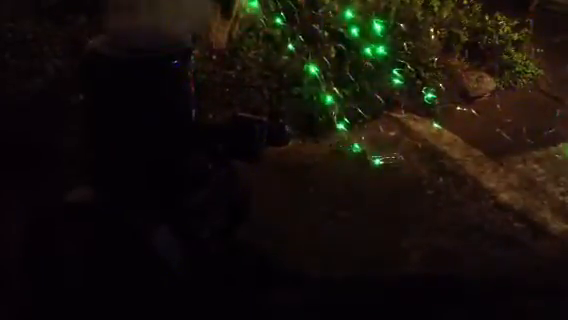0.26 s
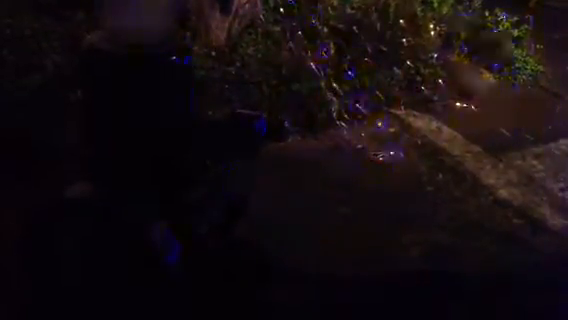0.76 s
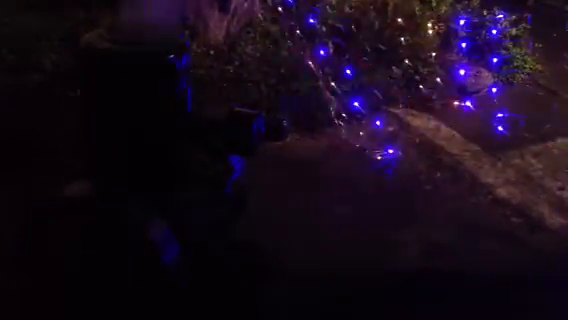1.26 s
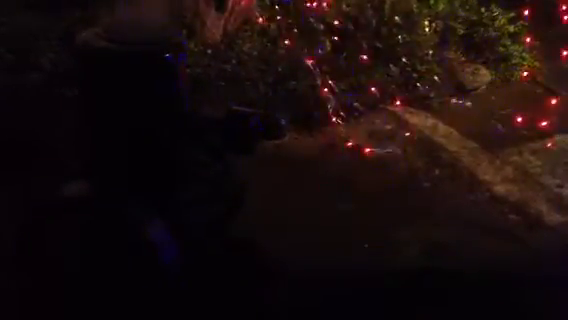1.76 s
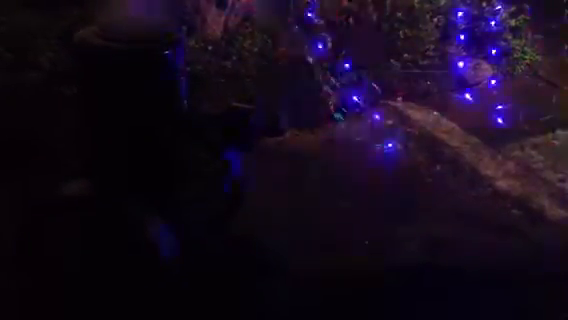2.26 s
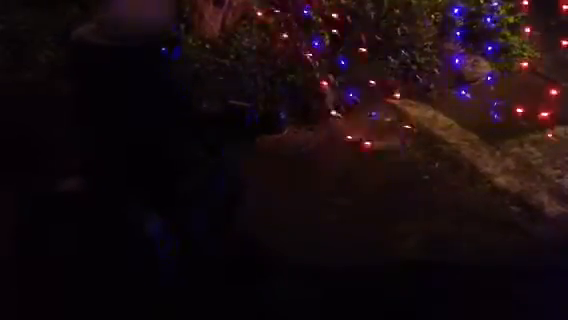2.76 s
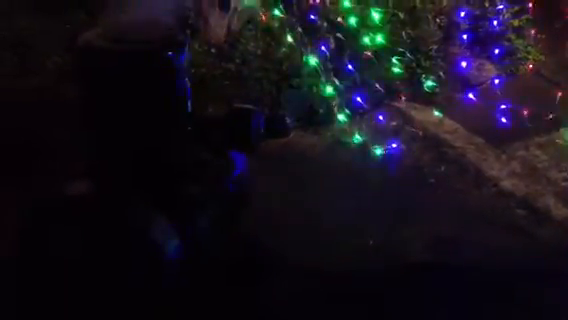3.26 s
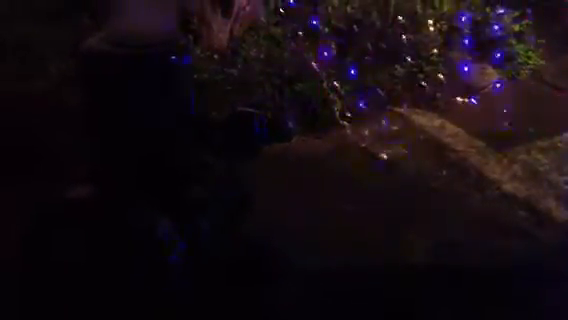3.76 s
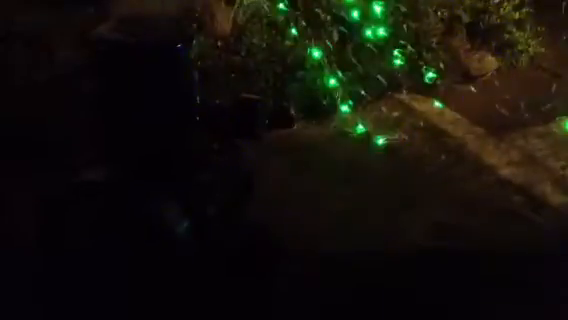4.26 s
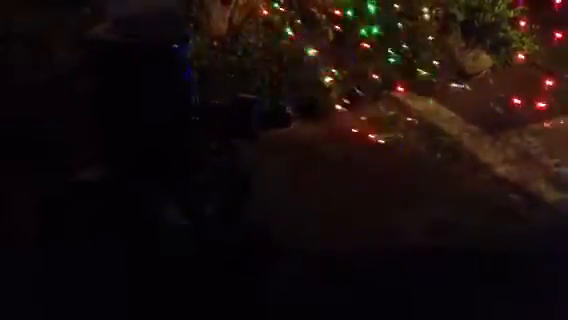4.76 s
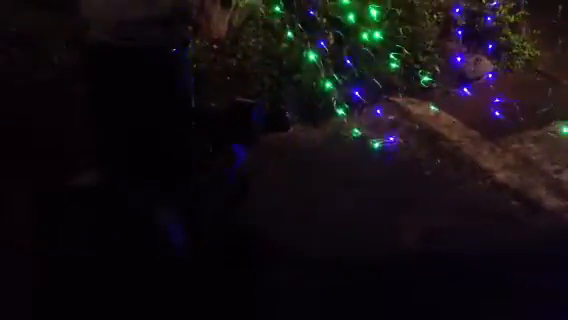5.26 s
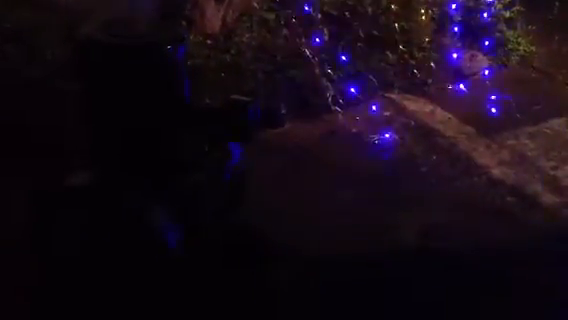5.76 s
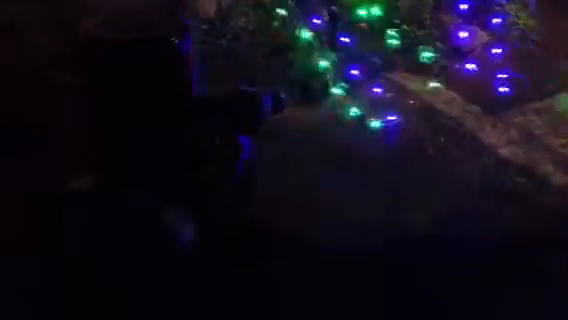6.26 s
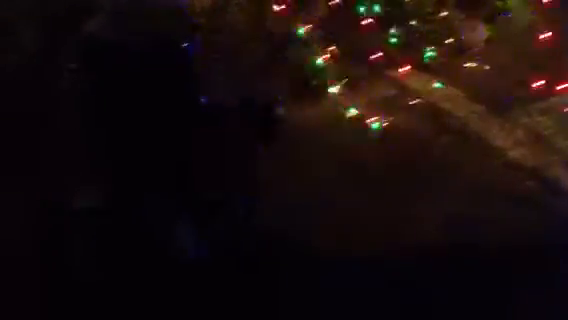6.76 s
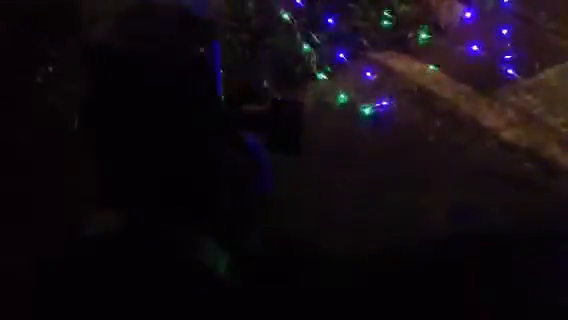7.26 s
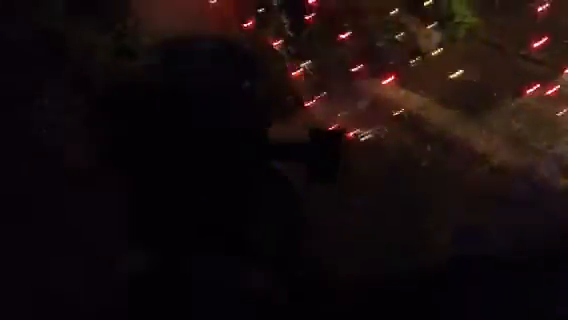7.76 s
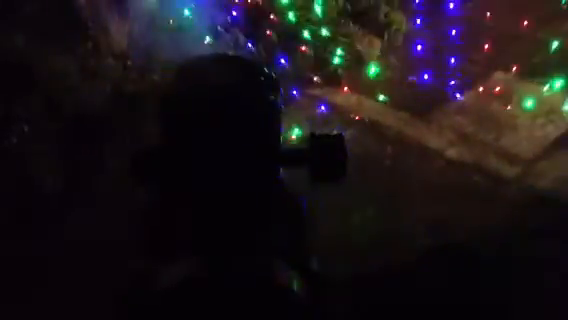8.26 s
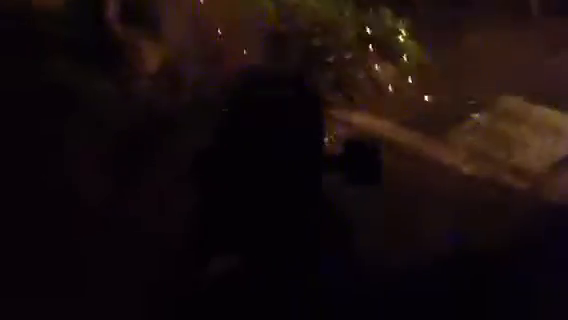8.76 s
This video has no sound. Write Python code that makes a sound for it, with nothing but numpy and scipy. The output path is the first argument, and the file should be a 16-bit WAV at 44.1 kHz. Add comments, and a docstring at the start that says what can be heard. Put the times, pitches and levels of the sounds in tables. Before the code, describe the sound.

From the very start, a slow single-cylinder engine is idling in a yard, a few steps from the microphone. It thumps evenly about four times a second for the whole nine seconds, speeding up only very slightly. Each beat is a sharp exhaust pop with a short squealing rush of gas, a quick metallic ring from the silencer and a soft boom from the pipe, followed by brief reflections from the yard. Between beats, more quietly, the intake gulps, valves clack and gears clatter. From about 6.5 seconds the microphone moves closer: the beats and clacks grow louder, the yard's reverberation becomes fuller, and a low hum and a thin high hiss swell, peaking around 8.5 seconds. One faint, short scuff comes at about 8.7 seconds. The level eases a little, and the engine is still running at the end.

```python
"""A slow single-cylinder engine thumps four times a second in a yard, a few steps away.
Each firing is a pressure pulse and a short squealing gas jet; the silencer rings, the pipe booms,
the yard answers. Between firings the intake gulps, valves clack and gears clatter.
Late on the microphone moves in: the yard, a low hum and a thin hiss swell, with one brief scuff."""
import sys
import numpy as np
from scipy import signal
from scipy.fft import rfft, irfft, next_fast_len
from scipy.io import wavfile

SR = 44100
rng = np.random.default_rng(int(sys.argv[2]) if len(sys.argv) > 2 else 0)


def generate_wav(signal):
    """Clip the signal to [-1, 1] and save it as 16-bit WAV at the path in sys.argv[1]."""
    frames = np.transpose(np.atleast_2d(signal))
    scaled = np.clip(frames, -1, 1) * 32767
    pcm = np.round(scaled).astype(np.int16)
    wavfile.write(sys.argv[1], SR, pcm)


N = 397782
LEAD = SR // 10  # the engine is already running at 0 s
TIME_S = np.arange(-LEAD, N) / SR
AGE_S = np.arange(SR // 3) / SR  # time since a firing

# engine speed: time_s, firings_per_s
SPEED = [(0.0, 3.8571), (0.8, 3.9007), (1.8, 3.9229), (2.5, 3.9684), (4.4, 3.9695), (6.1, 4.0299),
         (7.5, 4.0423), (8.8, 4.0013)]
# microphone closeness: time_s, near_db
NEARNESS = [(0, -1.5), (1.5, -.5), (3, 0), (5, 0), (6.2, -.3), (7, 2.5), (8, 4), (8.5, 4.5), (9.02, 3)]


def amp(db):
    return 10 ** (np.asarray(db) / 20)


def unit_rms(x):
    return x / np.sqrt(np.mean(x ** 2) + 1e-20)


def at_time(curve, time_s=TIME_S):
    return np.interp(time_s, *np.transpose(curve))


def at_freq(curve, hz):
    freq_hz, value = np.transpose(curve)
    return np.interp(np.log(hz + 1), np.log(freq_hz + 1), value)


def noise(n=len(TIME_S)):
    return rng.standard_normal(n)


def coloured_noise(spectrum, n=len(TIME_S)):
    size = next_fast_len(n)
    gain = amp(at_freq(spectrum, np.fft.rfftfreq(size, 1 / SR)))
    return unit_rms(irfft(rfft(noise(n), size) * gain, size)[:n])


def resonate(x, hz, width_hz):
    """Double-pole resonance, rms 1."""
    pole = np.exp((2j * np.pi * hz - np.pi * width_hz) / SR)
    return unit_rms(signal.lfilter([1], [1, -2 * pole, pole * pole], x).real)


def ring(modes, rise_s, detune=.012):
    """Modes struck once; gas heat shifts their pitch a little."""
    hz, db, t60_s = np.transpose(modes)[:, :, None]
    hz = hz * (1 + detune * rng.standard_normal(hz.shape))
    partials = amp(db - 60 * AGE_S / t60_s) * np.sin(2 * np.pi * hz * AGE_S)
    return partials.sum(0) * (1 - np.exp(-AGE_S / rise_s))


def delayed(x, delay_s):
    return np.interp(AGE_S - delay_s, AGE_S, x, left=0)


def puff(age_s, rise_s, decay_s):
    return np.clip(age_s / rise_s, 0, 1) * np.exp(-np.maximum(age_s - rise_s, 0) / decay_s)


def firing_times(first_s=-.017, short_cycle=12, skip_s=.0232):
    """One firing per cycle. The sound skips once: a 23 ms dropout shortens one cycle."""
    times_s = [first_s]
    while times_s[-1] < N / SR:
        cycle_s = 1 / at_time(SPEED, times_s[-1])
        times_s.append(times_s[-1] + cycle_s - skip_s * (len(times_s) - 1 == short_cycle))
    return np.array(times_s)


def crank():
    """Per sample: time since the last firing, cycle length."""
    times_s = firing_times()
    last_s = times_s[np.maximum(np.searchsorted(times_s, TIME_S, side="right") - 1, 0)]
    return np.maximum(TIME_S - last_s, 0), 1 / at_time(SPEED, last_s)


def strokes(events, age_s, cycle_s, scatter_db=1.5):
    """Envelope of events tied to crank angle; levels vary per cycle."""
    turn = np.cumsum(np.diff(age_s, prepend=0) < 0)
    sizes = amp(scatter_db * rng.standard_normal((turn[-1] + 1, len(events))))
    power = sum((amp(db) * size[turn] * puff(age_s - phase * cycle_s, rise_s, decay_s)) ** 2
                for size, (phase, rise_s, decay_s, db) in zip(sizes.T, events))
    return np.sqrt(power)


def blowdown(near_db, front_s=.0007, round_trip_s=.0023):
    """Exhaust valve opens: a steep push and suck, then its return from the pipe."""
    def wave(centre_s, width_s):
        u = (AGE_S - centre_s) / width_s
        return -u * np.exp(-u * u / 2)
    front = wave(front_s, width_s=.0002) + amp(5.5) * wave(front_s, width_s=.00015)
    onset = 1 - np.exp(-(AGE_S / .00015) ** 2)
    echo = wave(front_s + round_trip_s * rng.uniform(.975, 1.025), width_s=.00017)
    echo_db = 4.3 - 2 * near_db  # fades as the microphone moves round the pipe
    return amp(.4) * (front * onset + amp(echo_db) * echo)


def silencer(near_db):
    """The pulse strikes the silencer: a bright ring and a deep thud."""
    # silencer resonances: pitch_hz, level_db, t60_s
    ring_modes = [(450, -12, .022), (680, -8.5, .018), (1385, -15, .022), (1820, -17, .02),
                  (2350, -16, .018), (3950, -6, .018), (4500, -9, .018), (7400, -19, .012)]
    # deep body mode: pitch_hz, level_db, t60_s
    thud_mode = [(415, 3.5, .0155)]
    clang = amp(3) * delayed(ring(ring_modes, rise_s=.0006), delay_s=.00123)
    return clang + amp(-.9 * near_db) * ring(thud_mode, rise_s=.0003)


def jet(start_s, near_db, peak_s=.0112, spread_s=.0049):
    """Gas bursts from the pipe: turbulent rush, fixed squeal, wandering lower whistle."""
    # turbulence: freq_hz, density_db
    spectrum = [(40, -19), (100, -14), (220, -1), (400, -4), (600, -5), (1100, -5), (1700, .5), (2250, 1),
                (2800, -8), (3800, 2.5), (5700, -4.5), (7200, 2), (9000, 2), (11000, -1.5), (15000, -2)]
    # lock into the squeal, which drains the rush: time_s, lock_db
    locking = [(0, 0), (1.0, 2), (1.6, -3), (2.8, .5), (3.5, -1), (5.3, 1.5), (6.0, 5), (6.6, 2), (7.05, 2),
               (7.5, -2.5), (8.3, 0), (9.02, -4)]
    # lower whistle: time_s, level_db, pitch_hz
    whistling = [(0, -22, 2120), (1.6, -22.5, 2160), (2.4, -27.5, 1900), (3.3, -24.5, 2050),
                 (3.9, -20.5, 2200), (4.6, -25.5, 2050), (5.7, -25, 2220), (6.8, -19.5, 1960),
                 (7.3, -25, 1970), (9.02, -26, 2250)]
    time_s, level_db, pitch_hz = np.transpose(whistling)
    lock_db = at_time(locking, start_s)
    rush_db = rng.normal(-10.8, .4) - .45 * lock_db - .15 * near_db
    squeal_db = rng.normal(-17.2, 1.2) + lock_db
    whistle_db = np.interp(start_s, time_s, level_db) + rng.normal(1.2, 1.2)
    whistle_hz = np.interp(start_s, time_s, pitch_hz) + rng.normal(0, 50)
    n = SR // 25
    age_s = AGE_S[:n]
    flow = np.exp(-((age_s - peak_s) / spread_s) ** 2 / 2) * (1 - np.exp(-(age_s / .004) ** 2))
    rush = amp(rush_db) * unit_rms(flow * coloured_noise(spectrum, n))
    squeal = amp(squeal_db) * unit_rms(flow * resonate(noise(n), hz=4680, width_hz=560))
    whistle = amp(whistle_db) * unit_rms(flow * resonate(noise(n), whistle_hz, width_hz=340))
    flow_rms = np.sqrt(np.mean(flow ** 2))
    return np.pad(flow_rms * (rush + squeal + whistle), (0, len(AGE_S) - n))


def pipe_mouth(x, near_db):
    """A narrow pipe radiates little bass; the cutoff falls as the microphone nears."""
    cutoff_hz = 202 * 2 ** (-.06 * near_db)
    return signal.sosfilt(signal.butter(2, cutoff_hz, "high", fs=SR, output="sos"), x)


def yard(shot, near_db, tail_db=-1, walls_db=-5.5):
    """Short diffuse tail, plus reflections that shift as the microphone moves."""
    # reverberation: freq_hz, t60_s
    decay = [(100, .26), (400, .2), (1500, .22), (3200, .26), (4600, .22), (6000, .24), (9000, .2),
             (15000, .18)]
    # ground and wall reflections: delay_s, level_db, shift_s_per_near_db
    reflections = [(.006, -7, .0002), (.0098, -13, 0), (.0192, -11, -.0001), (.0232, -9, -.0011),
                   (.035, -16, 0), (.048, -18, -.0015)]
    n = len(shot)
    hz, time_s, bins = signal.stft(noise(n), SR, nperseg=256)
    bins *= amp(-60 * time_s / at_freq(decay, hz)[:, None])
    tail = signal.istft(bins, SR, nperseg=256)[1][:n] * np.clip(AGE_S / .008, 0, 1)
    diffuse = signal.fftconvolve(shot, tail / np.linalg.norm(tail))[:n]
    walls = sum(amp(db) * delayed(shot, delay_s + shift * near_db + rng.normal(0, .0001))
                for delay_s, db, shift in reflections)
    return amp(-11 + 1.5 * near_db) * (amp(tail_db) * diffuse + amp(walls_db) * walls)


def boom(near_db, delay_s=.015, rise_s=.004):
    """The pipe's air column and a low hum build behind the pulse."""
    # air column: pitch_hz, level_db, t60_s
    column_modes = [(93, -22, .3), (140, -18.5, .25), (178, -21.5, .23), (240, -14, .17), (290, -17, .13)]
    # hum, heard only close by: pitch_hz, level_db, t60_s
    hum_modes = [(192, -19, .45), (255, -15, .13)]
    column = amp(-10.3 + .1 * near_db) * ring(column_modes, rise_s, detune=.015)
    hum = amp(-17 + 2.7 * near_db) * ring(hum_modes, rise_s, detune=.03)
    return delayed(column + hum, delay_s)


def exhaust():
    """All firings, each slightly different, with boom and yard."""
    mix = np.zeros(len(TIME_S))
    for start_s in firing_times()[:-1]:
        near_db = at_time(NEARNESS, start_s)
        pulse_gain = amp(rng.normal(-14.6, .6) + .75 * near_db)
        gas = jet(start_s, near_db)
        pulse = pulse_gain * (blowdown(near_db) + silencer(near_db))
        shot = pipe_mouth(pulse + gas, near_db)
        firing = shot + pulse_gain * boom(near_db) + yard(shot, near_db)
        span = mix[round(start_s * SR) + LEAD:][:len(firing)]
        span += firing[:len(span)]
    return mix


def gears(jolts_per_s=130, jolt_db=2.2, taps_per_s=45):
    """Teeth meet unevenly; backlash taps the casing."""
    # gear clatter: freq_hz, density_db
    spectrum = [(30, -35), (75, -20), (210, -2), (400, -5.5), (600, -12.5), (950, -2), (1150, -1),
                (1360, 2.5), (1600, -4), (2200, -4), (3000, -15), (4000, -15), (4700, -9), (5600, -19),
                (15000, -21)]
    n = len(TIME_S)
    jolts = np.interp((TIME_S - TIME_S[0]) * jolts_per_s, np.arange(n), noise())
    clatter = amp(-45.5 + jolt_db * jolts) * coloured_noise(spectrum)
    taps = rng.uniform(.3, 1, n) * (rng.random(n) < taps_per_s / SR)
    return clatter + amp(-52) * resonate(taps, hz=1370, width_hz=190)


def intake(age_s, cycle_s):
    """Gulps of air ring the intake tract."""
    # gulps: start_cycles, rise_s, decay_s, level_db
    gulps = [(.272, .004, .009, -31), (.322, .007, .015, -32), (.5, .006, .009, -39),
             (.63, .006, .012, -46)]
    # airway noise: freq_hz, density_db
    spectrum = [(50, -38), (140, -20), (260, -9), (430, -10), (600, -14), (950, -8), (1330, -2), (1600, -5),
                (2100, -5), (2900, -11), (6000, -24), (15000, -36)]
    envelope = strokes(gulps, age_s, cycle_s)
    air = coloured_noise(spectrum)
    tract = amp(-5) * resonate(noise(), hz=1330, width_hz=240)
    return envelope * unit_rms(air + tract)


def valves(age_s, cycle_s):
    """Steel valves clack at set crank angles; just before each firing the injector ticks."""
    # clacks, then the injector tick: start_cycles, rise_s, decay_s, level_db
    clacks = [(.301, .0005, .008, -30.7), (.34, .004, .012, -38), (.52, .004, .008, -45),
              (.972, .001, .002, -49)]
    # struck steel: freq_hz, density_db
    spectrum = [(60, -28), (150, -12), (280, 3), (430, 8), (600, -6), (2000, -5), (3100, -8), (4000, -6),
                (4700, 3), (5400, -7), (7500, -9), (10000, -12), (15000, -14)]
    return strokes(clacks, age_s, cycle_s) * coloured_noise(spectrum)


def mid_cycle_hiss(age_s, cycle_s):
    """A faint hiss swells midway between firings, then drops away."""
    # hiss: freq_hz, density_db
    spectrum = [(300, -20), (2200, 0), (3200, -2), (4600, 3), (5800, 2), (7500, -4), (15000, -7)]
    phase = age_s / cycle_s
    swell = np.exp(-((phase - .51) / .125) ** 2)
    drop = np.clip((phase - .6) / .1, 0, 1)
    return amp(-41) * swell ** (1 + drop) * coloured_noise(spectrum)


def hiss_and_scuff(scuff_s=8.673, scuff_db=-37):
    """Thin high hiss grows late on, with one short scuff."""
    # hiss swell: time_s, level_db
    swell = [(0, -64), (6.5, -60), (7.5, -55), (8.1, -51), (8.6, -46), (9.02, -52)]
    spectrum = [(1000, -20), (4000, -7), (7500, 0), (14000, 0)]  # freq_hz, density_db
    scuff = amp(scuff_db) * puff(TIME_S - scuff_s, rise_s=.008, decay_s=.025)
    return (amp(at_time(swell)) + scuff) * coloured_noise(spectrum)


def scene():
    """Mono mix; up close, clacks and mid-cycle hiss grow faster than gulps and gears."""
    age_s, cycle_s = crank()
    near_gain = amp(at_time(NEARNESS))
    firings = exhaust()
    gulps = intake(age_s, cycle_s)
    bright = valves(age_s, cycle_s) + mid_cycle_hiss(age_s, cycle_s)
    machinery = near_gain * (gulps + gears()) + near_gain ** 1.45 * bright
    return (firings + machinery + hiss_and_scuff())[None, LEAD:]


def record(dry, low_cut_hz=70, ceiling=.85, high_cut_hz=15300):
    """Microphone: bass cut, soft clip, band limit."""
    thin = signal.sosfilt(signal.butter(2, low_cut_hz, "high", fs=SR, output="sos"), dry)
    rounded = ceiling * np.tanh(thin / ceiling)
    lowpass = signal.firwin(401, high_cut_hz, window=("kaiser", 8), fs=SR)
    return signal.oaconvolve(rounded, lowpass[None], "same")


dry = scene()
out = record(dry)
generate_wav(out)
```